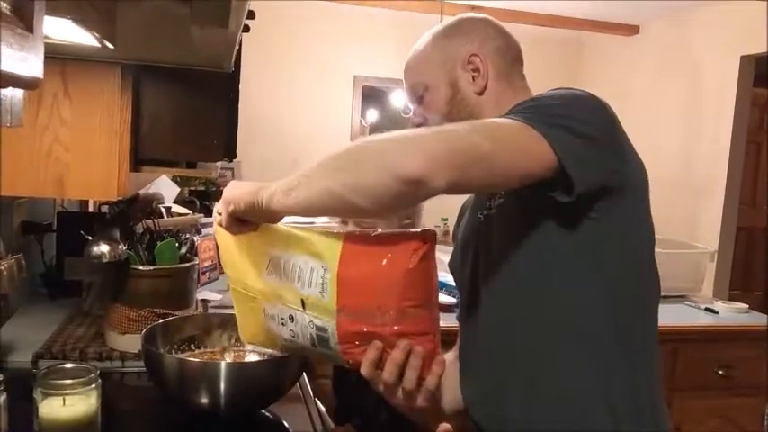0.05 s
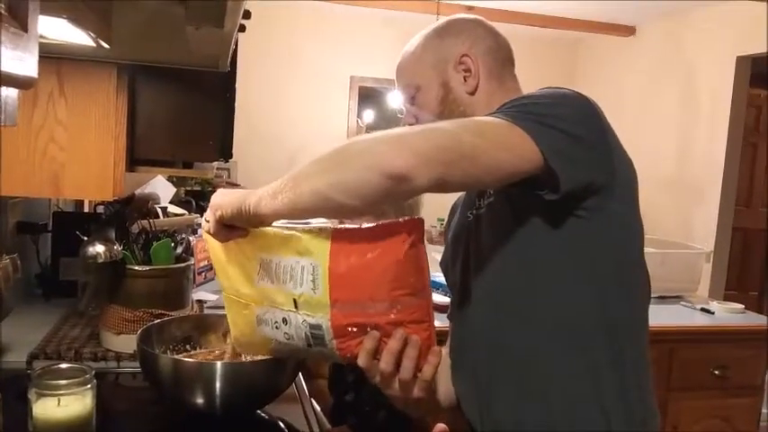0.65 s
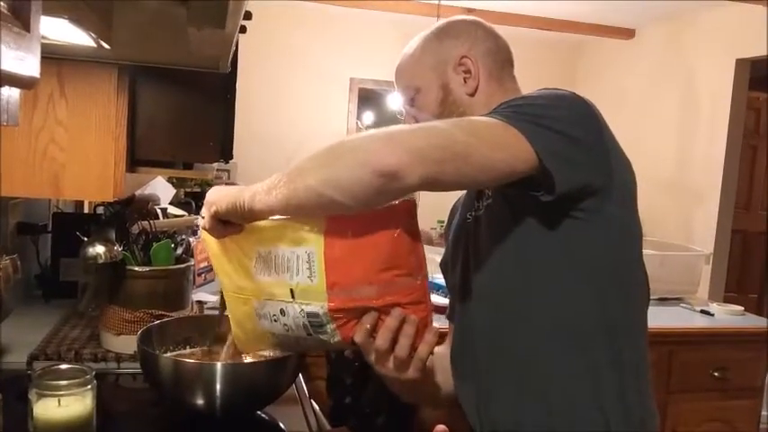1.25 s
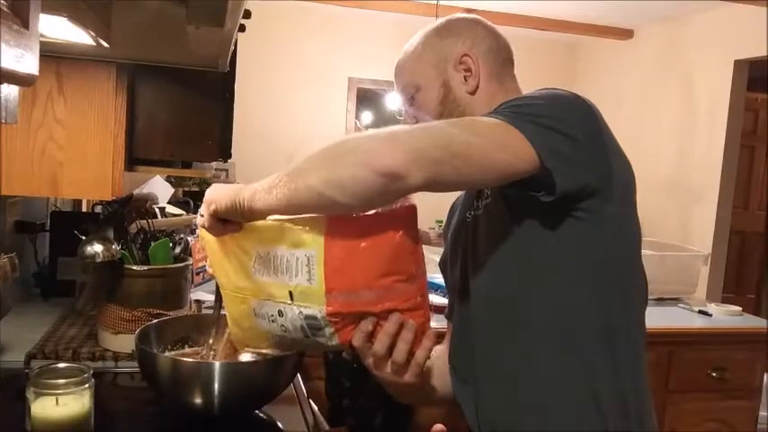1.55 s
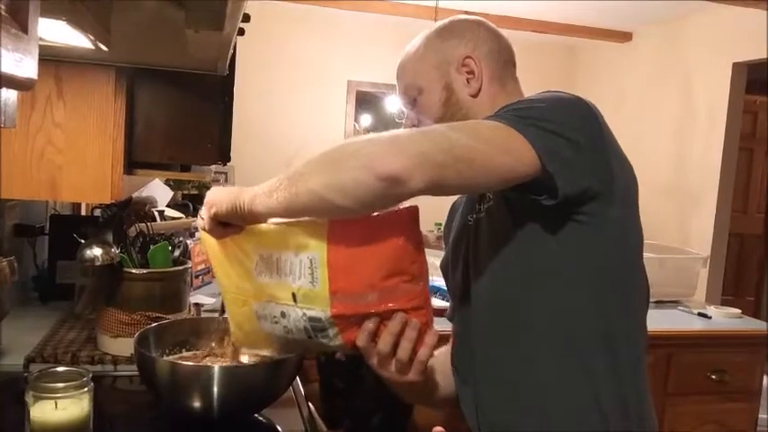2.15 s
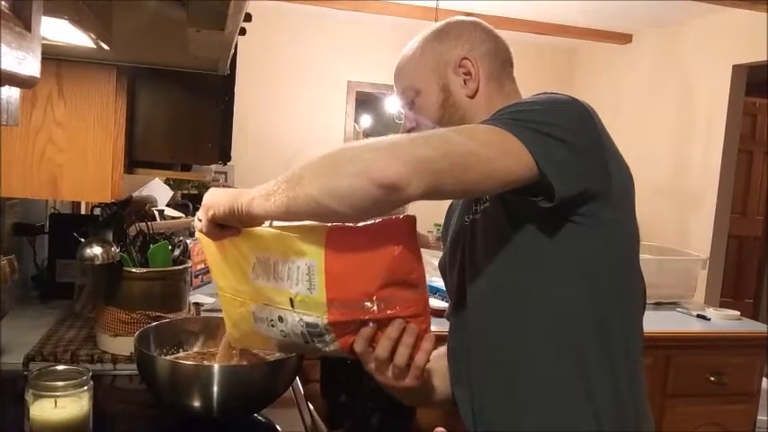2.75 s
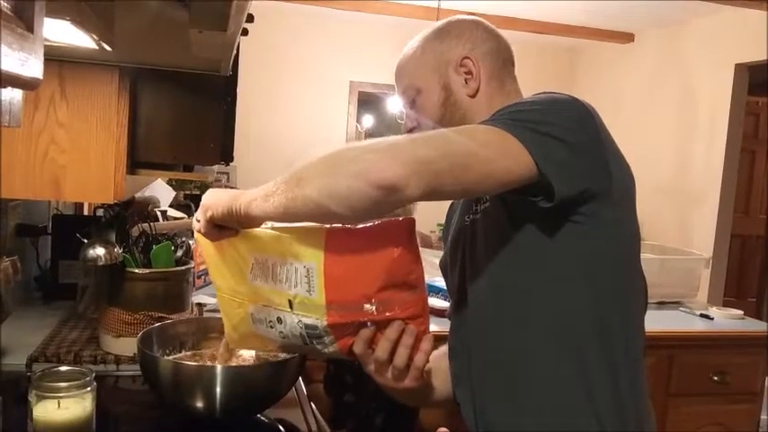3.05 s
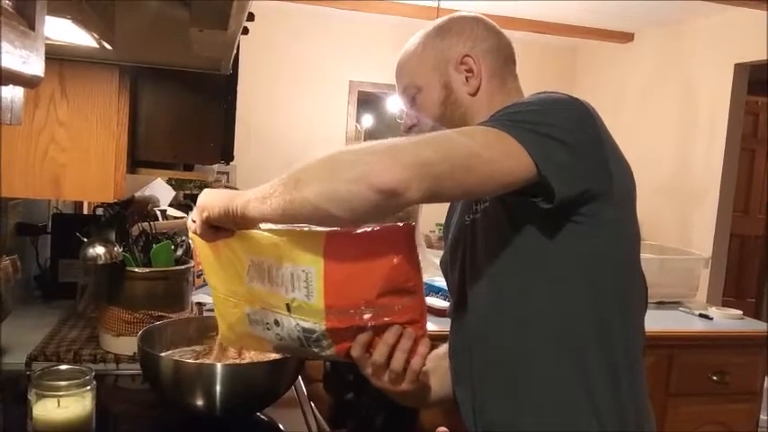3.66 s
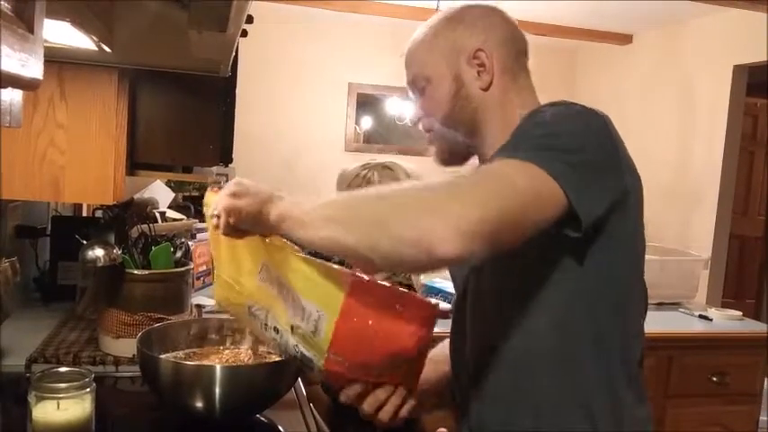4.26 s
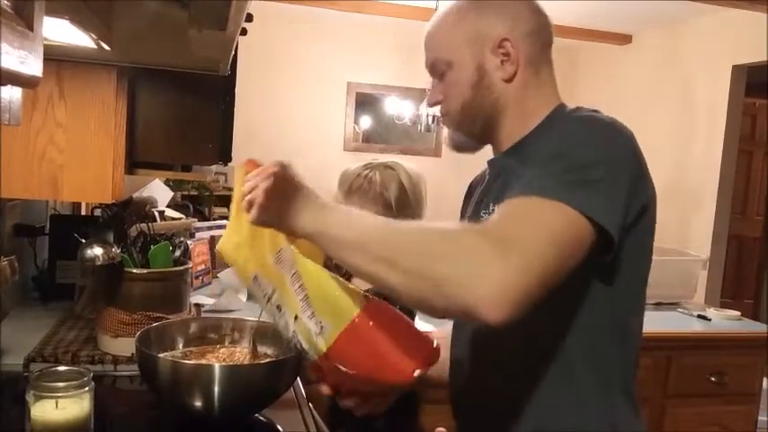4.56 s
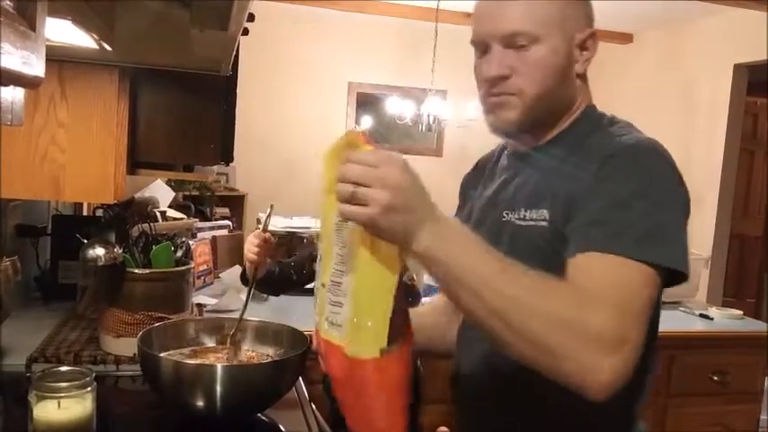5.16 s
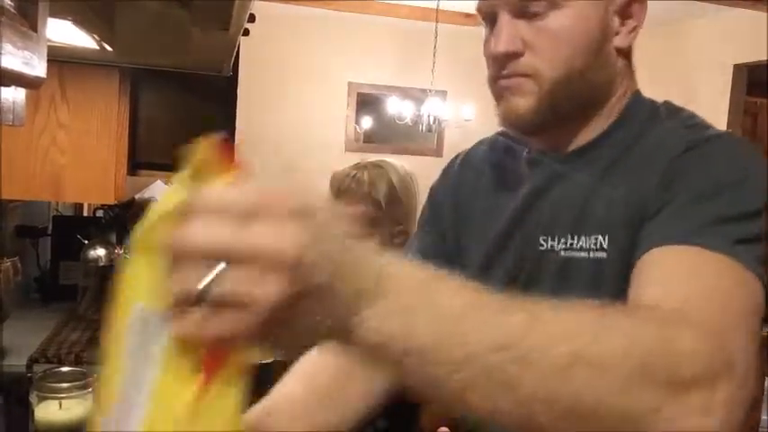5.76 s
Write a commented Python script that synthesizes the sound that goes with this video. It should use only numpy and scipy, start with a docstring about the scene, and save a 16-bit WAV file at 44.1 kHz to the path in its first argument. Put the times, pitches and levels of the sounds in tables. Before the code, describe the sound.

From the start, birdseed pours from a big plastic bag into a steel bowl, a fine, bright hiss and patter that comes in surges for four seconds, strongest around 2.3 seconds. The taut plastic snaps sharply near 1 and 2.3 seconds. A wooden spoon knocks lightly against the dull-sounding bowl near 0.4, 2.7 and 3.2 seconds, then crunches softly through the seed until about 4. Between 4.1 and 4.8 seconds the bag is raised: it creaks briefly under the fingers and its creases crack, with a firmer spoon knock at 4.4. The remaining seed slides back down inside, slumping loudly at 5 seconds and rustling on with more plastic cracks and light knocks. Just before 6 seconds the bag lands with a close, grainy crash, the loudest moment. The kitchen adds a short echo and a faint steady background, heard in mono.

```python
"""Birdseed pours from a big plastic bag into a steel bowl of melted fat, in a kitchen, heard in mono.
For four seconds it comes in surges, hissing over the bag's lip and pattering on the heap, while the taut
plastic snaps and a wooden spoon knocks and crunches in the bowl. Then the bag is raised: it creaks under
slipping fingers, its creases crack, and the rest of the seed slides back and slumps at five seconds.
Just before six the bag lands with a close crash."""
import sys
import numpy as np
from scipy import signal
from scipy.fft import rfft, irfft
from scipy.io import wavfile
from scipy.ndimage import uniform_filter1d

SR = 44100
rng = np.random.default_rng(int(sys.argv[2]) if len(sys.argv) > 2 else 0)


def master(y):
    """Save y as 16-bit WAV."""
    cut = np.clip(np.atleast_2d(y).T, -1, 1)
    pcm = np.round(cut * 32767)  # scale
    wavfile.write(sys.argv[1], SR, pcm.astype(np.int16))


N = 265305
TIME = np.arange(N) / SR

# Each tip of the bag lets out a surge. Each row: crest in seconds, seconds to rise 10 dB, seconds to
# fall 10 dB, then husk ticks, dull patter and lip hiss in relative dB.
SURGES = [(.053, 0.6, 0.2, -37.5, -42, -68), (.22, .27, .78, -33, -45, -55),
          (1.011, 0.06, .17, -34, -47.5, -60), (1.444, 0.37, 0.35, -33, -46, -53),
          (1.823, 0.34, 0.21, -38.5, -57, -59), (2.116, 0.27, .11, -38.5, -50.5, -58.5),
          (2.321, 0.0439, 0.1, -26.5, -39.5, -47), (2.601, 0.07, .2, -33, -47.5, -48.5),
          (2.985, 0.34, .39, -41, -54, -62), (3.316, .08, 0.17, -41, -51, -69),
          (3.61, .06, .105, -37, -47.5, -56.5), (3.881, .11, .17, -44.5, -50, -68)]
# Seed slides back down the bag. Each row: crest in seconds, seconds to rise 10 dB, seconds to fall
# 10 dB, husk ticks in dB, dull patter in dB.
SLIDES = [(4.148, .01, 0.5, -49, -51), (4.302, 0.02, 0.13, -34.5, -37), (4.463, 0.1153, .115, -34.5, -37.5),
          (4.748, .08, 0.36, -28.5, -38), (4.94, .165, .16, -28, -39.5), (5.1, 0.13, 0.31, -28.5, -35.5),
          (5.35, .09, 0.07, -28.5, -38.5), (5.522, .063, 0.06, -28.5, -36), (5.718, .2, .31, -53, -48.5)]
# The load hits the bottom as the bag comes upright, then as it lands. Rows read like the slides;
# the last one, with its negative fall, keeps swelling to the end.
SLUMPS = [(5.002, .011, .03, -16, -27), (5.014, .008, .014, -16, -22), (5.046, .02, .04, -25.5, -36),
          (5.917, .006, 0.05, -14.5, -23), (5.937, 0.01, .06, -10, -23.5), (6.01, .018, -1, -18, -24.5)]
# The plastic buckles. Each row: start in seconds, run of the crease in seconds, then crack, sharp edge
# and pop in dB, pitch of the pop in Hz.
SNAPS = [(.389,.002,-29,-54,-40,1044), (.422,.008,-33,-44,-38,760), (.912,.003,-30.5,-50,-45,1733),
         (.963,.003,-18.5,-28,-22,1600), (1.054,.005,-36,-46,-46,1787), (1.0923,.002,-28,-54,-40,1690),
         (1.827,.006,-53,-41,-60,1000), (2.312,.003,-23.5,-29,-35,1324), (3.526,.005,-36,-60,-44,1496),
         (4.141,.01,-43,-70,-50,1238), (4.2935,.006,-20,-27.5,-21,980), (4.3271,.0035,-19.5,-32,-29,462),
         (4.411,.008,-25.5,-35,-30,1550), (4.456,.006,-32,-47,-35,1690), (4.4735,.008,-29.5,-38,-37,829),
         (4.6218,.009,-36,-55,-44,1690), (4.656,.009,-28.5,-49,-39,1604), (4.754,.007,-28,-41,-30,1087),
         (5.301,.003,-17.5,-29,-30,1593), (5.4595,.003,-19.5,-34,-27,990), (5.659,.003,-24,-43,-24,1022),
         (5.695,.002,-25.5,-55,-35,1571), (5.768,.003,-33.5,-70,-46,1765), (5.8432,.005,-35.5,-60,-37,452),
         (5.902,.003,-29,-37,-42,1205), (5.909,.003,-21,-31,-32,904), (5.915,.004,-16,-18,-24,893),
         (5.921,.003,-15,-24,-28,915), (5.9657,.002,-16,-18,-27,1033)]
# The spoon meets the bowl. Each row: start in seconds, knock in relative dB, spoon pitch in Hz,
# crunch of trapped seeds in relative dB.
KNOCKS = [(.427,-27,900,-30), (1.667,-37,794,-36), (2.556,-42,784,-39), (2.681,-34.5,1086,-32.5),
          (3.2451,-27,1000,-37), (3.395,-43,1005,-37.5), (4.412,-16.5,970,-33), (5.660,-29,690,-35),
          (5.8815,-26.5,653,-35)]
# The spoon ploughs the heap, clear of the steel. Each row: start in seconds, crunch in relative dB.
STIRS = [(3.575, -37), (3.668, -37), (3.783, -35), (3.796, -38.5), (3.866, -36), (3.936, -37.5),
         (4.04, -42.5)]

# Resonances. Each row: pitch in Hz, relative level in dB, seconds to die by 60 dB.
BOWL_MODES = [(447, -24, 0.058), (649, -25, 0.074), (902.5, -21.5, 0.089), (1274, -16, 0.056),
              (1660, -27, 0.033), (2930, -6.5, 0.025)]   # the bowl, damped by fat
TICK_MODES = [(1900, -11, .02), (2950, 0, .025), (3380, -5, .015), (4200, -3, .008)]   # a narrow, bright ring near 3 kHz on single seed ticks
PANEL_MODES = [(465, -25, .015), (705, 6, .02), (810, 1, .018), (1040, 0, .02), (1350, -7, .0086)]   # a taut panel of the bag, before its pitch is bent
# The spoon's short wooden knock, with a faint ring lingering in the room near its pitch.
# Each row: multiple of that pitch, relative level in dB, seconds to die by 60 dB.
KNOCK_MODES = [(1, -2, .036), (1.02, -24, .2), (1.78, -17, .08), (2.72, -11, .035)]

# Tone curves. Each row: frequency in Hz, relative level in dB.
POUR_COLOUR = [(100, -46.5), (200, -37), (400, -18), (700, -14), (950, -7.5), (1150, -12.5), (1700, -9),
               (2300, -5.7), (2650, -1), (2950, -0.5), (3250, -1), (4400, -3.5), (5300, -8.5), (6300, -19),
               (10000, -31.5), (16000, -39.5)]   # seed falling into the bowl
LIP_COLOUR = [(3000, -8), (5300, 7), (7000, -1.5), (10000, -18.5), (13000, -15), (16000, -25)]   # seed skimming the bag's lip
SLIDE_COLOUR = [(100, -62), (220, -34.5), (390, -14.5), (800, -9.5), (1500, -7), (2100, -1.5), (2950, 2.5),
                (4400, 1), (5200, -4.5), (6100, -14), (8000, -24), (10000, -33.5), (13000, -35.5),
                (16000, -48)]   # seed sliding inside the bag
SLUMP_COLOUR = [(40, -60), (200, -45), (450, -9), (680, -13), (980, -4), (1500, -9), (2200, -2),
                (2900, 0.5), (4100, 1.5), (5200, -8.5), (6200, -23), (8000, -34), (11000, -54),
                (16000, -45)]   # the load hitting the bottom
SNAP_COLOUR = [(40, -52), (150, -38), (240, -22), (390, -12.5), (900, -5), (1400, -7), (2200, -1),
               (3000, 7.5), (4700, 3), (6200, -14.5), (8000, -20), (10500, -31.5), (13500, -33.5),
               (16000, -43)]   # cracking plastic
CRUNCH_COLOUR = [(200, -26), (400, -4.5), (1000, -2.5), (1700, 1.5), (3000, 3), (4500, -3.5), (6300, -24),
                 (10000, -31), (16000, -40)]   # seed crushed under the spoon
ROOM_COLOUR = [(25, -8), (80, -25), (150, -5), (300, 7.5), (500, 13.5), (1000, 3), (3000, 0.5), (7000, -2),
               (12000, -4.5), (16000, -2)]   # room tone
# The kitchen's reverb. Each row: frequency in Hz, seconds to die by 60 dB.
KITCHEN_T60 = [(150, 0.41), (500, 0.52), (2000, 0.24), (5000, 0.37), (14000, 0.64)]


def pouring(level_db, lip_db, bowl_db):
    """The stream hisses over the bag's lip, patters on the heap and sets the bowl ringing."""
    crest, rise, fall, tick_db, patter_db, hiss_db = np.transpose(SURGES)
    stream = swell(crest, rise, fall, tick_db)
    heap = swell(crest, rise, 1.52 * fall, patter_db)   # the heap ebbs more slowly than the stream
    lip = swell(crest, rise, fall, hiss_db)
    patter = seeds(stream, heap, POUR_COLOUR, per_s=6000, spread_db=1.5, split_hz=1930, clump_db=1.0)
    hiss = excite(grains(7000, spread_db=3.0), lip, LIP_COLOUR, 4500, "high")
    steel = heap * rms_one(band(bowl(grains(1500, spread_db=4.0)), 290, "high"))
    strays = stream * stray_seeds(per_s=170, tick_db=-14, ring_db=-18)
    return from_db(level_db) * patter + from_db(lip_db) * hiss + from_db(bowl_db) * steel + strays


def seeds(tick_gain, patter_gain, colour, per_s, spread_db, split_hz, clump_db):
    """Hard husks tick against each other; the soft heap and the bag answer with a dull patter."""
    bunches = clumps(clump_db, per_s=300)
    ticks = excite(grains(per_s, spread_db) * bunches, tick_gain, colour, split_hz, "high")
    patter = excite(grains(per_s, spread_db) * bunches, patter_gain, colour, split_hz, "low")
    return ticks + patter


def clumps(depth_db, per_s):
    """Seeds arrive in small bunches: a quickly wandering gain of unit power."""
    knots = np.cumsum(rng.exponential(1 / per_s, 3000))
    wander = np.interp(TIME, knots, rng.uniform(-0.84, 1, len(knots)))
    return rms_one(from_db(depth_db * wander))


def stray_seeds(per_s, tick_db, ring_db):
    """Single seeds bounce out of the stream, each tick with a narrow, bright ring near 3 kHz."""
    hits = grains(per_s, spread_db=1.5)
    ringing = rms_one(band(resonate(hits, TICK_MODES), 1500, "high"))
    return excite(hits, from_db(tick_db), POUR_COLOUR, 1200, "high") + from_db(ring_db) * ringing


def bowl(impacts):
    """The steel bowl rings briefly, damped by its load."""
    return resonate(impacts, BOWL_MODES)


def shifting_load(moves, colour, **texture):
    """Seed tumbles inside the bag, each move a swell of ticks and patter."""
    crest, rise, fall, tick_db, patter_db = np.transpose(moves)
    return seeds(swell(crest, rise, fall, tick_db), swell(crest, rise, fall, patter_db), colour, **texture)


def bag_snaps(first_crack, cracks_per_s, pop_t60, thud_hz, edge_hz, slack_from_s):
    """A patch of plastic pops through at its own pitch, and a crease runs from it in tiny cracks."""
    starts, run_s, crack_db, edge_db, pop_db, pop_hz = np.transpose(SNAPS)
    slack = starts > slack_from_s   # once raised, the bag rattles longer and thuds more
    t60 = np.where(slack, .03, .026)
    thud_db = -38 + .68 * (crack_db - crack_db.mean()) + 1.5 * slack   # harder cracks thud harder
    creases = grains(cracks_per_s, spread_db=0)
    creases[np.round(starts * SR).astype(int)] = first_crack
    crack = excite(creases, bursts(starts, crack_db, t60, run_s), SNAP_COLOUR, [thud_hz, edge_hz], "band")
    thud = excite(creases, bursts(starts, thud_db, t60, run_s), SNAP_COLOUR, thud_hz, "low")
    thud = np.where(TIME > slack_from_s, thud, band(thud, 620, "high"))   # taut plastic sounds thin
    edge = excite(creases, bursts(starts, edge_db, .026, run_s), SNAP_COLOUR, edge_hz, "high")
    pops = sum(ring(click(s, db), hz, pop_t60) for s, db, hz in zip(starts, pop_db, pop_hz))
    body = crack + band(pops, 480, "high") + thud
    return kitchen(body, wet_db=-6, gap_s=.005) + kitchen(edge, wet_db=-10, gap_s=.005)


def spoon(bowl_db, crunch_db, crunch_t60):
    """Wood knocks on the bowl at a pitch set by the grip; knocks and stirs both crush seeds."""
    knocks = sum(ring(click(s, knock_db + db), multiple * hz, t60)
                 for s, knock_db, hz, _ in KNOCKS for multiple, db, t60 in KNOCK_MODES)
    steel = bowl(sum(click(s, knock_db + bowl_db) for s, knock_db, _, _ in KNOCKS))
    crushes = list(STIRS) + [(s, db) for s, _, _, db in KNOCKS]
    crushing = bursts(*np.transpose(crushes), crunch_t60, hold_s=0.0038)
    crunch = excite(grains(9000, spread_db=0.5), crushing, CRUNCH_COLOUR, 270, "high")
    return band(knocks + steel, 620, "high") + from_db(crunch_db) * crunch


def bag_creak(start_s, length_s, fade_s, level_db, jitter, rub_t60):
    """Fingers stick and slip on the bag: each uneven slip jerks and briefly rubs the taut panel."""
    age = TIME - start_s
    grip = np.clip(np.minimum(age, length_s - age) / fade_s, 0, 1)
    slack = np.clip(age / length_s, 0, 1)
    slips_per_s = 105 - 25 * slack   # as the panel slackens the slips slow and its pitch sinks
    pitch_ratio = 1.03 * (1 - .26 * slack ** 3)
    wander = rms_one(uniform_filter1d(rng.standard_normal(N), size=300))
    slip_count = np.floor(np.cumsum(slips_per_s * np.exp(jitter * wander)) / SR)
    slips = np.diff(slip_count, prepend=0)
    rubs = signal.lfilter([1], [1, -from_db(-60 / (rub_t60 * SR))], slips) * rng.standard_normal(N)
    drive = rms_one(slips) + rms_one(rubs)
    panel = rms_one(band(resonate(drive, PANEL_MODES), 380, "high"))
    bent = np.interp(np.cumsum(np.where(age > 0, pitch_ratio, 1)), np.arange(N), panel)
    return from_db(level_db) * grip * bent


def kitchen(x, wet_db, gap_s):
    """Diffuse echoes from walls and cupboards join the sound; the upper mids die first."""
    age = TIME[:SR * 3 // 4]
    edges = np.geomspace(60, 18000, 9)
    tail = 0
    for low, high in zip(edges, edges[1:]):
        echoes = band(rng.standard_normal(len(age)), [low, high], "band")
        tail = tail + echoes * from_db(-60 * age / at_hz(KITCHEN_T60, np.sqrt(low * high)))
    tail = rms_one(tail * (age > gap_s)) / np.sqrt(len(age))
    return x + from_db(wet_db) * signal.fftconvolve(x, tail)[:N]


def room_tone(level_db):
    """A faint, steady bed of noise, fullest in the low mids."""
    return from_db(level_db) * rms_one(coloured(rng.standard_normal(N), ROOM_COLOUR))


def grains(per_s, spread_db):
    """Random impacts of either sign; spread lifts a few well above the rest."""
    sizes = from_db(spread_db * np.minimum(rng.exponential(1, N), 4))
    return rms_one(sizes * rng.choice([-1, 1], N) * (rng.random(N) < per_s / SR))


def click(s, level_db):
    """One click, s seconds in."""
    return from_db(level_db) * signal.unit_impulse(N, round(s * SR))


def swell(crest, rise, fall, level_db):
    """Envelope that builds to each crest and ebbs, evenly in dB; overlaps add in power."""
    age = TIME - crest[:, None]
    drop_db = 10 * np.minimum(np.maximum(-age / rise[:, None], age / fall[:, None]), 10)
    return np.sqrt(from_db(level_db) ** 2 @ from_db(-drop_db) ** 2)


def bursts(times, levels_db, t60s, hold_s):
    """Envelope of sudden bursts that hold for an instant and die."""
    out = np.zeros(N)
    age = TIME[:SR // 4]
    for s, db, t60, hold in np.broadcast(times, levels_db, t60s, hold_s):
        start = round(s * SR)
        shape = from_db(db - 60 * np.maximum(age - hold, 0) / t60)
        out[start:start + len(age)] += shape[:N - start]
    return out


def excite(impacts, envelope, colour, hz, kind):
    """Impacts ride an envelope and excite one range of a body; unit envelope gives unit power."""
    sound = band(coloured(impacts * envelope, colour), hz, kind)
    response = band(coloured(signal.unit_impulse(4096), colour), hz, kind)
    return sound / np.sqrt(np.sum(response ** 2))


def resonate(impacts, modes):
    """Impacts ring a set of resonances."""
    return sum(from_db(db) * ring(impacts, hz, t60) for hz, db, t60 in modes)


def ring(clicks, hz, t60):
    """A unit click sets a sine of height 1 ringing."""
    r, w = from_db(-60 / (t60 * SR)), 2 * np.pi * hz / SR
    return signal.lfilter([0, np.sin(w)], [1, -2 * r * np.cos(w), r * r], clicks + 1e-18)


def coloured(x, colour, size=4096):
    """Minimum-phase EQ along a tone curve, so attacks stay sharp."""
    gains = from_db(at_hz(colour, np.fft.rfftfreq(size, 1 / SR)))
    cepstrum = irfft(np.log(gains))
    cepstrum[1:size // 2] *= 2
    cepstrum[size // 2 + 1:] = 0
    return signal.fftconvolve(x, irfft(np.exp(rfft(cepstrum))))[:len(x)]


def band(x, hz, kind):
    """Low-, high- or band-pass filter."""
    return signal.sosfilt(signal.butter(4, hz, kind, fs=SR, output="sos"), x + 1e-18)


def at_hz(points, hz):
    """Read a table on a log-frequency axis."""
    knots, values = np.transpose(points)
    return np.interp(np.log(hz + 1), np.log(knots), values)


def from_db(db):
    """Decibels to gain."""
    return 10 ** (np.asarray(db) / 20)


def rms_one(x):
    """Scale to unit power."""
    return x / np.sqrt(np.mean(x ** 2) + 1e-20)


def scene():
    """Seeds, bag and spoon sound from different spots of one kitchen; both channels are the same."""
    pour = kitchen(pouring(level_db=-1.6, lip_db=1.5, bowl_db=-7), wet_db=-9.5, gap_s=.0035)
    slides = shifting_load(SLIDES, SLIDE_COLOUR, per_s=7000, spread_db=1.0, split_hz=1530, clump_db=2.2)
    slides = kitchen(slides, wet_db=-10, gap_s=.0019)
    slumps = shifting_load(SLUMPS, SLUMP_COLOUR, per_s=9000, spread_db=1.93, split_hz=1760, clump_db=2.9)
    slumps = kitchen(slumps, wet_db=-9, gap_s=.004)
    snaps = bag_snaps(first_crack=2.2, cracks_per_s=12000, pop_t60=.017,
                      thud_hz=1610, edge_hz=5960, slack_from_s=4.1)
    knocks = spoon(bowl_db=-6, crunch_db=-3.5, crunch_t60=.08)
    creak = bag_creak(start_s=4.125, length_s=.33, fade_s=.11, level_db=-39.5, jitter=.2, rub_t60=.026)
    bed = room_tone(level_db=-63.5)
    handling = snaps + kitchen(knocks + creak, wet_db=-9.5, gap_s=.0032)
    return np.tile(pour + slides + slumps + handling + bed, (2, 1))


def record(dry):
    """Soft saturation rounds the highest peaks; a steep low-pass cuts the very top."""
    top_cut = signal.ellip(12, .1, 80, 15950, fs=SR, output="sos")
    return signal.sosfilt(top_cut, np.tanh(dry))


dry = scene()
out = record(dry)
master(out)
```